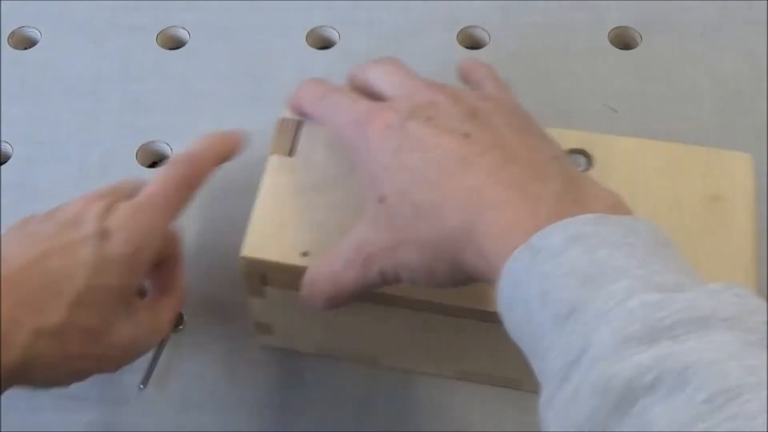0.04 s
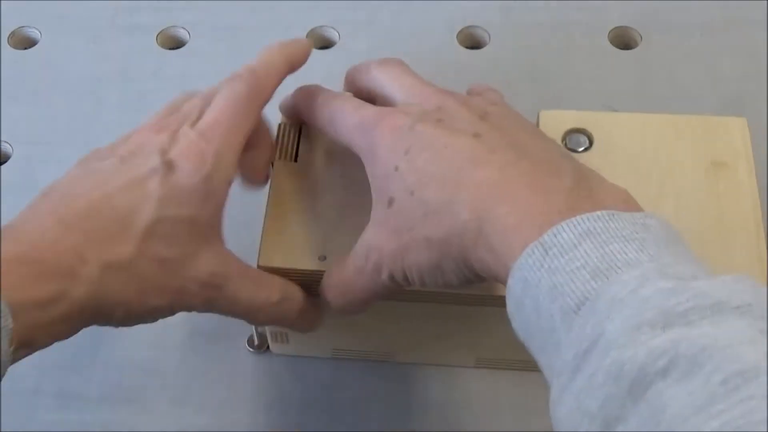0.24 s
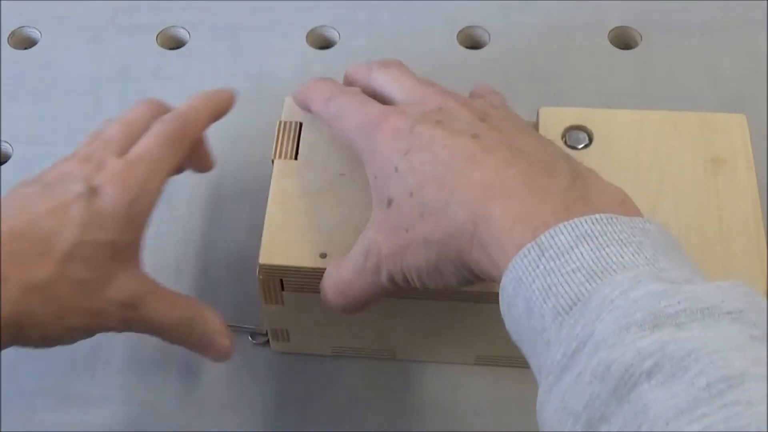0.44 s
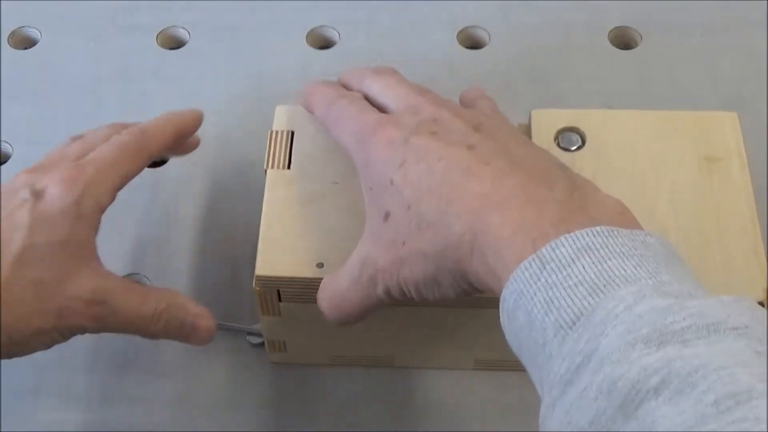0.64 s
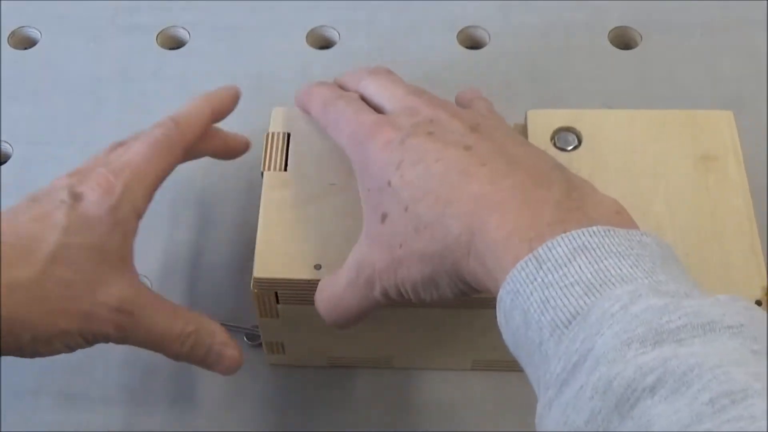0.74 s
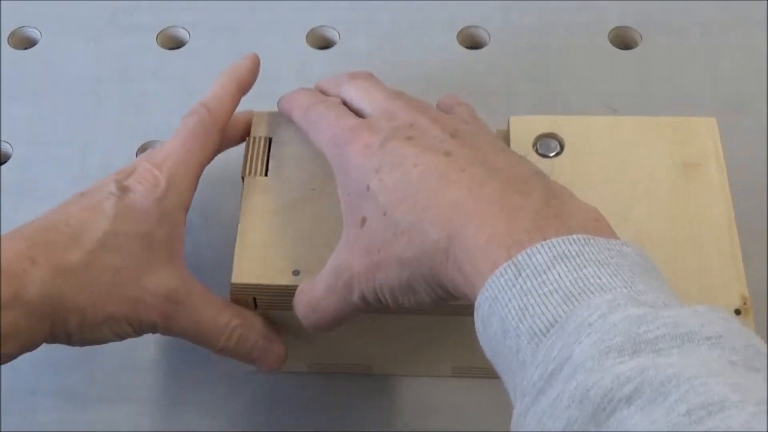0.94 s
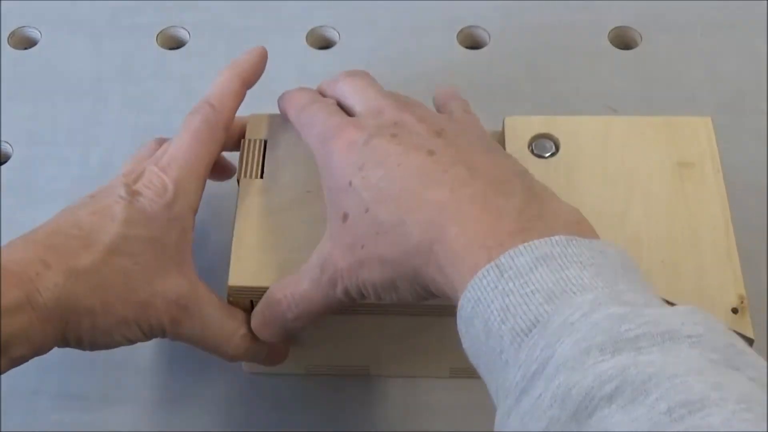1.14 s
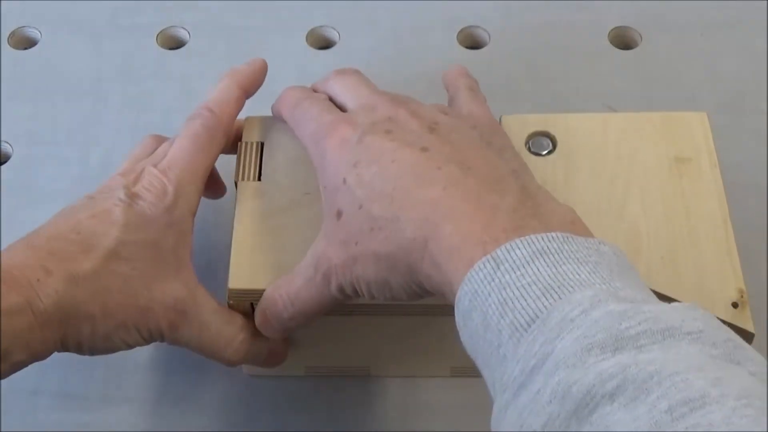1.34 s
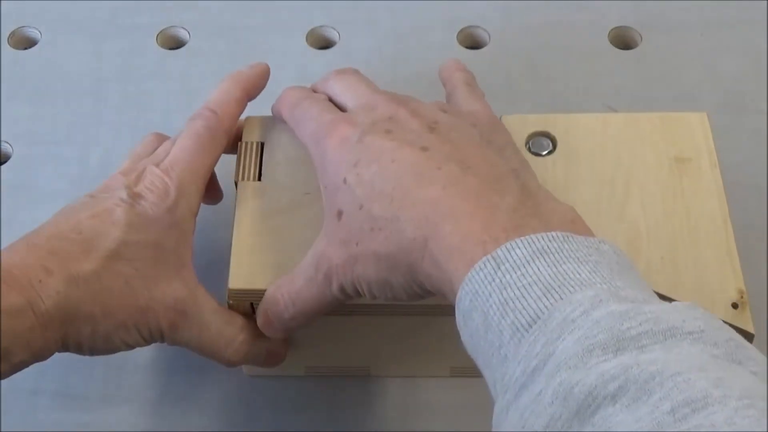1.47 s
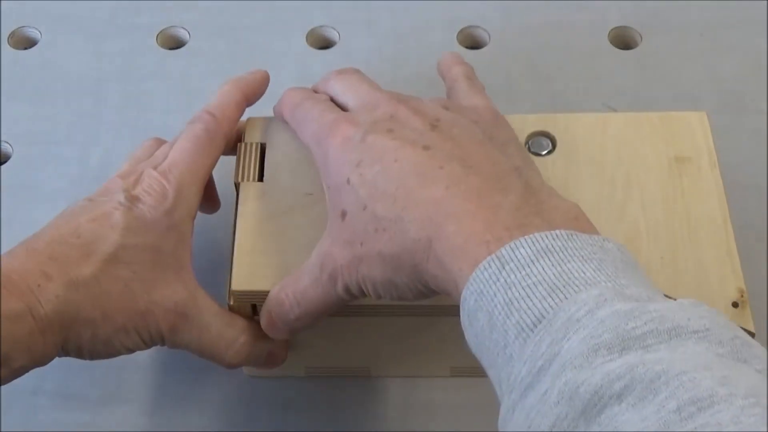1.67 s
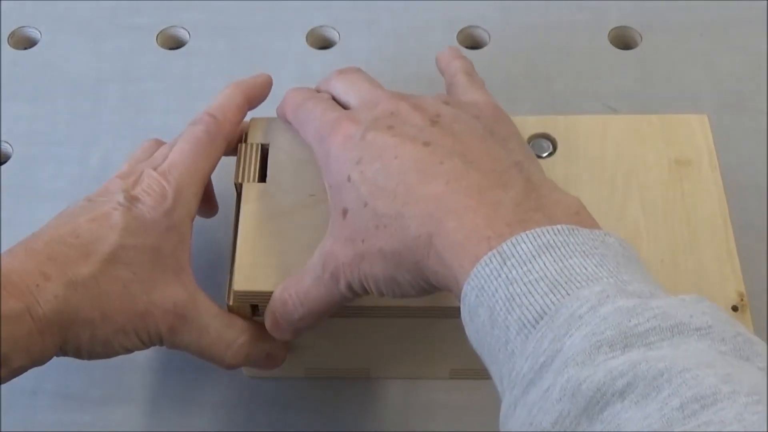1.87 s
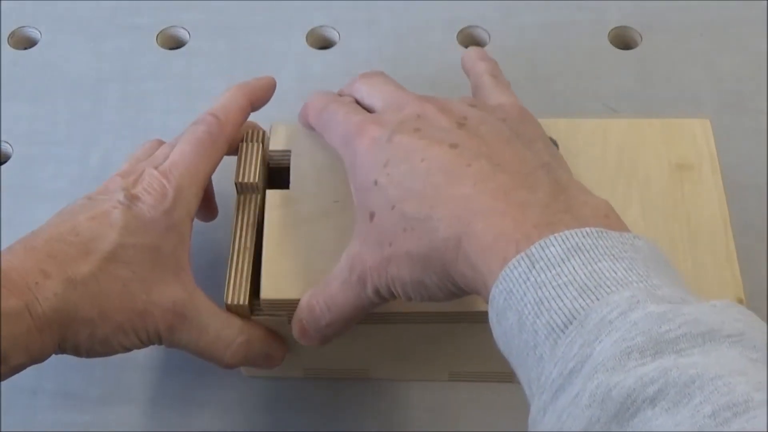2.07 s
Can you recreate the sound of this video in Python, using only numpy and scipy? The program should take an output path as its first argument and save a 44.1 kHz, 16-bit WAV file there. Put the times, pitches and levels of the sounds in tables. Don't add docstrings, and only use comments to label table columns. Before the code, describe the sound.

Wood box dragged on a bench, small steel key clinking, then faint rubs and a brief lid scrape.

```python
import sys
import numpy as np
from scipy import signal
from scipy.fft import rfft, irfft, next_fast_len
from scipy.io import wavfile
from scipy.ndimage import uniform_filter1d, map_coordinates

SR = 44100
rng = np.random.default_rng(int(sys.argv[2]) if len(sys.argv) > 2 else 0)


def pcm_store(signal):
    levels = np.round(np.clip(np.atleast_2d(signal), -1, 1) * 32767)
    wavfile.write(sys.argv[1], SR, levels.astype(np.int16).T)


def makeup_ratio(level_db):
    decades = np.asarray(level_db, float) / 20
    return 10 ** decades


N = 92830

# frequency in Hz, left-right likeness from 0 to 1.
WOOD_ALIKE = [(200, 1), (1000, 1), (4000, 0.95), (10000, 0.99)]


def unit(x):
    return x / np.sqrt(np.mean(x ** 2) + 1e-20)


def along(points, hz):
    f, v = np.transpose(points)
    return np.interp(np.log(hz + 1), np.log(f + 1), v)


def closed(points):
    low_end, high_end = (points[0][0] * .5, -70), (points[-1][0] * 1.2, -70)
    ends = [low_end] + list(points) + [high_end]
    return lambda hz: makeup_ratio(along(ends, hz))


def resonant(peaks):
    def response(f):
        total = 0
        for k, (centre, width, db) in enumerate(peaks):
            mode = 1j * f * width / (centre * centre - f * f + 1j * f * width)
            total = total + (-1) ** k * makeup_ratio(db) * mode
        return total
    return response


def filtered(x, response):
    m = next_fast_len(N + SR // 2)
    return irfft(rfft(x, m) * response(np.fft.rfftfreq(m, 1 / SR)), m)[..., :N]


def wobble(rate):
    knots = rng.standard_normal(int(N * rate / SR) + 4)
    return map_coordinates(knots, [np.arange(N) * rate / SR])


def paired(a, b, alike):
    def mid_side(hz):
        angle = np.arccos(np.clip(along(alike, hz), -1, 1)) / 2
        return np.array([np.cos(angle), np.sin(angle)])
    mid, side = filtered(np.array([a, b]), mid_side)
    return np.array([mid + side, mid - side])


def mains_hum():
    # multiple of the mains frequency, level in dB.
    harmonics = [(1, -53.5), (2, -58), (3, -55.5), (4, -81), (5, -65), (6, -65), (7, -70.5), (8, -63.5),
                 (19, -66), (20, -73), (24, -63.5)]
    mains_hz, waver_db = 58.9, 1.2
    phase = 2 * np.pi * mains_hz * np.arange(N) / SR + 0.086 * wobble(3.7)
    hum = np.zeros(N)
    for k, db in harmonics:
        hum += makeup_ratio(db - 0.5 + waver_db * wobble(7.17)) * np.cos(k * phase - 0.32 * k)
    return hum


def steady_hiss():
    # frequency in Hz, level in dB per Hz.
    air_spectrum = [(15, -41), (25, -21), (63, 4.5), (87, -12.5), (200, -7.5), (363, -7), (545, -10.5),
                    (1020, -10.5), (1500, -9), (2100, -14.5), (16000, -26)]
    # frequency in Hz, left-right likeness from 0 to 1.
    air_alike = [(100, 0.99), (1000, 0.34), (4000, 0.37), (10000, 0.89)]
    a, b = filtered(rng.standard_normal((2, N)), closed(air_spectrum))
    return makeup_ratio(-50) * unit(paired(a, b, air_alike))


def slips():
    slips_per_s, spread_db, patchy_db = 6000, 2.5, 1.1
    hit = rng.random(N) < slips_per_s / SR
    size = makeup_ratio(spread_db * np.clip(rng.standard_normal(N), -2, 2))
    raw = hit * rng.standard_normal(N) * size + 0.47 * rng.standard_normal(N)
    z = signal.stft(raw, nperseg=256)[2]
    patches = uniform_filter1d(rng.standard_normal(z.shape), size=4, axis=0)
    patches = uniform_filter1d(patches, size=10, axis=1)
    return unit(signal.istft(z * makeup_ratio(patchy_db * unit(patches)), nperseg=256)[1][:N])


def scrape():
    # time in seconds, speed as level in dB,
    # weight on the box in dB, dry rubbing hiss in dB.
    drag = [
        (.005, -45.5, -5, 1),
        (0.033, -55.5, 17, 5),
        (0.042, -36, 3, -2.5),
        (0.077, -24, 7, -10.5),
        (0.179, -27, 2, -18),
        (.27, -26, -11, -12.5),
        (.37, -35, -2, -14.5),
        (.46, -39.5, -4.5, -8.5),
        (.54, -52.5, 2, -42),
    ]
    nudges = [
        [(.57, -51.5, -3, -10), (.61, -42, -1, -7.5), (.64, -39, 1, -22), (.68, -46.5, 2.5, -15),
         (.712, -38, 1, -15), (.76, -47, 5, -30), (.8, -53.5, 9, -20)],
        [(.81, -48.5, 2, -17), (.848, -37.5, -13, -20.5), (.97, -32.5, -1, -15.5), (1.035, -33, -4, -20.5),
         (1.06, -41, 0, -21), (1.13, -49, 0, -12), (1.18, -49.5, 3.5, -2.5), (1.25, -51.5, 3, -13)],
    ]
    lid_slide = [
        (1.928, -54, 12, -13),
        (1.955, -48, 0, -11),
        (1.98, -39, -2, -11),
        (2.025, -43, -1.5, -11.5),
        (2.039, -41, 3, -5),
        (2.053, -40, -3, -18),
        (2.07, -39.5, 4, -9),
        (2.105, -36.5, -5, -15),
    ]
    rasp_levels = [-5.5, -13.5, -16, -24]
    # frequency in Hz, level in dB per Hz.
    grain_spectrum = [(120, -48), (200, -33), (710, 2), (937, 8), (1780, 3.5), (2120, 1), (2520, -4),
                      (5460, -30.5), (6500, -23), (8450, -68), (14300, -120)]
    rasp_spectrum = [(2000, 10), (2500, -4.5), (3300, -0.5), (4500, -4.5), (5500, -4), (6100, -7),
                     (7500, -10)]
    rub_spectrum = [(6500, -9), (8000, -2), (10000, 0), (12000, -2), (14000, -16.5), (15800, -13)]
    # frequency in Hz, width in Hz, level in dB.
    panel_modes = [(469, 64, 3), (661, 17, 11), (903, 16, 5.5), (1273, 23, 12), (1599, 22, 6.5),
                   (2170, 33, 9.5), (2910, 36, -2.5), (3230, 22, 0), (3680, 630, -12.5), (4580, 130, -7.5),
                   (5150, 1300, -18.5)]
    hollow_modes = [(215, 62, 3), (307, 20.6, 6.5), (440, 134, -1)]
    lid_modes = [(1287, 19, 1), (2155, 42, 0.5), (2510, 25, -12), (3220, 29, -17), (4000, 250, -13),
                 (4680, 44, -14), (5300, 150, -15)]
    seated_modes = [(1278, 27, 3.5), (1140, 33, 2), (2510, 26, -8), (3400, 60, -14), (4100, 150, -15),
                    (5200, 170, -11.5)]
    ring_db, lid_db, hollow_db, lid_grain_db, judder_db = -0.5, -0.5, -7, -1.5, .6
    lid_from_s, seat_s, seat_span_s = 1.6, 2.025, .03
    rasp_lift = 0.49

    t = np.arange(N) / SR
    speed, weight, rub, rasp = np.zeros((4, N))
    for rows, rasp_db in zip([drag, lid_slide, *nudges], rasp_levels):
        s, db, press_db, rub_db = np.transpose(rows)
        gain = makeup_ratio(np.interp(t, s, db, left=-120, right=-120))
        press = np.interp(t, s, press_db)
        speed = speed + gain
        weight = weight + gain * makeup_ratio(press)
        rasp = rasp + gain * makeup_ratio(rasp_db - rasp_lift * press)
        rub = rub + gain * makeup_ratio(np.interp(t, s, rub_db))
    judder = makeup_ratio(judder_db * (wobble(61.44) + wobble(200)))
    on_bench = t < lid_from_s
    seated = np.clip((t - seat_s) / seat_span_s, 0, 1)

    def layer(drive, colour):
        return unit(filtered(drive, colour))

    def take(drive):
        fibres = np.where(on_bench, 1, makeup_ratio(lid_grain_db)) * layer(drive, closed(grain_spectrum))
        panels = makeup_ratio(ring_db) * layer(drive, resonant(panel_modes))
        lid = np.sqrt(1 - seated) * layer(drive, resonant(lid_modes))
        lid = lid + np.sqrt(seated) * layer(drive, resonant(seated_modes))
        wood = speed * 0.6 * (fibres + np.where(on_bench, panels, makeup_ratio(lid_db) * lid))
        hollow = weight * makeup_ratio(hollow_db) * layer(drive, resonant(hollow_modes))
        edge = rasp * layer(slips(), closed(rasp_spectrum))
        hiss = rub * layer(rng.standard_normal(N), closed(rub_spectrum))
        return judder * (wood + hollow + edge + hiss)

    return paired(take(slips()), take(slips()), WOOD_ALIKE)


def damped_modes(rows):
    out, t = np.zeros(N + SR), np.arange(SR // 8) / SR
    for s, db, hz, t60 in rows:
        soft_start = 1 - np.exp(-t * hz * 3)
        ring = makeup_ratio(db + 1 - 60 * t / t60) * np.sin(2 * np.pi * hz * t)
        out[round(s * SR):][:len(t)] += ring * soft_start
    return out[:N]


def box_knocks():
    # start in seconds, peak in dB, frequency in Hz, t60 in seconds.
    knock_rows = [(.005, -36, 206, 0.034), (.0401, -33, 1150, 0.014), (.042, -22.5, 172, 0.05),
                  (.0712, -16, 227, 0.016), (.0713, -8, 327, 0.022), (.0716, -6, 1256, 0.015),
                  (.151, -13, 2170, 0.024), (.22, -38, 1560, 0.038), (.637, -32.5, 2120, 0.025),
                  (.41, -42, 176.6, 0.5), (.597, -34, 181, 0.054), (1.527, -34, 163, 0.041),
                  (1.77, -35.5, 215, 0.061), (1.926, -25, 205, 0.026), (2.065, -32, 302, 0.048)]
    return damped_modes(knock_rows)


def focus_motor():
    # frequency in Hz, level in dB, t60 in seconds.
    housing_modes = [(2480, -1, .011), (2850, -2, .007), (3300, 0, .012), (3900, -5, .006),
                     (4500, -7, .006)]
    weak_step_db = np.array([[-4], [-11], [-2], [-9], [-9]])
    first_s, period_s, count = .0708, .033367, 50
    tick_db, echo_s, echo_db, detune = -44, .008, -5, .012
    out, t = np.zeros(N), np.arange(SR // 40) / SR
    hz, level, t60 = np.transpose(housing_modes)[:, :, None]
    soft_start = 1 - np.exp(-t / .001)
    draws = rng.standard_normal((count, 2, 3, len(housing_modes), 1))
    for k, draw in enumerate(draws):
        for late_s, db, (size, pitch, phase) in zip((0, echo_s), (0, echo_db), draw):
            decay = makeup_ratio(level + weak_step_db * (k % 2) + 1.1 * size - 60 * t / t60)
            tone = np.sin(2 * np.pi * hz * (1 + detune * pitch) * t + 2 * phase)
            ring = decay * tone * soft_start
            start = round((first_s + k * period_s + late_s) * SR)
            out[start:][:len(t)] += makeup_ratio(tick_db + 8 + db) * ring.sum(axis=0)
    return out


def key_clinks():
    # start in seconds, peak in dB, centre in Hz, width in octaves, length in seconds.
    clink_rows = [(.1488, -13, 4700, .2, .006), (.1489, -15, 10500, .25, .006),
                  (.151, -17, 4700, .25, .008), (.1515, -17, 10700, .2, .008),
                  (.1545, -17, 10300, .22, .006), (.1555, -20, 4000, .5, .005),
                  (.1578, -21, 9500, .3, .003), (.1635, -20, 11500, .22, .003), (.169, -24, 9000, .3, .003),
                  (.1795, -26, 10000, .2, .002), (.182, -24, 9000, .2, .003), (.189, -25, 10500, .25, .003),
                  (.2048, -22, 10000, .3, .003), (.2195, -5, 8500, .35, .0025),
                  (.2196, -11, 3500, .7, .0025), (.2207, -5, 7500, .4, .004), (.2208, -11, 2500, .7, .003),
                  (.223, -19, 10500, .2, .005), (.2312, -6, 11500, .33, .003), (.2313, -15, 4500, .5, .003),
                  (.238, -10, 10200, .33, .0035), (.2392, -17, 5000, .5, .004),
                  (.245, -24, 11000, .2, .004), (.2515, -24, 9000, .3, .005), (.2612, -14, 5500, .2, .008),
                  (.2625, -17, 11500, .35, .007), (.264, -18, 3600, .2, .012), (.277, -19, 9300, .25, .005),
                  (.3045, -26, 9800, .18, .003), (.322, -23, 9500, .18, .002),
                  (.3222, -29, 14000, .15, .002), (.0715, -19, 3700, .44, .008),
                  (.0716, -25, 10000, .15, .01), (1.9253, -35, 5000, .6, .004),
                  (1.9255, -37, 9500, .45, .004)]
    # frequency in Hz, level in dB, t60 in seconds.
    key_modes = [(3600, 0, .03), (4750, 0, .03), (5370, 1, .022), (6840, 0, .02), (8000, 1, .02),
                 (9200, 0, .014), (10600, -1, .016), (11850, -3, .012), (13400, -4, .01)]
    key_db, scatter_db, crack_db, crack_s = -12, 2, 3, .001
    out, t = np.zeros((2, N + SR)), np.arange(2048) / SR
    f = np.fft.rfftfreq(len(t), 1 / SR)
    mode_hz, mode_db, t60 = np.transpose(key_modes)[:, :, None]
    noises = rng.standard_normal((len(clink_rows), 3, len(t)))

    def near(freq, hz, octaves):
        return np.exp(-.5 * (np.log2((freq + 1) / hz) / octaves) ** 2)

    for (s, db, hz, octaves, length), noise in zip(clink_rows, noises):
        band = irfft(rfft(noise[:2]) * near(f, hz, octaves) * hz / (f + hz))
        power = band[0] ** 2
        band = band / np.sqrt(uniform_filter1d(power, size=60, mode="wrap") + 0.21 * np.mean(power))
        decay = makeup_ratio(mode_db + scatter_db * noise[2, :len(key_modes), None] - 60 * t / t60)
        ring = near(mode_hz, hz, octaves) * decay * np.sin(2 * np.pi * mode_hz * t)
        snap = 1 + makeup_ratio(crack_db) * np.exp(-t / crack_s)
        crack = makeup_ratio(-7 - 20 * t / length) * snap * band * (1 - np.exp(-t / .0001))
        out[:, round(s * SR):][:, :len(t)] += makeup_ratio(db) * (crack + makeup_ratio(key_db) * ring.sum(axis=0))
    return paired(*out[:, :N], WOOD_ALIKE)


def motor_stop():
    # start in seconds, peak in dB, frequency in Hz, t60 in seconds.
    stop_rows = [
        (1.7448, -33, 2720, .018),
        (1.7452, -38, 5720, .015),
        (1.7466, -30, 3300, .016),
        (1.7455, -41, 8200, .007),
        (1.7452, -41, 4000, .006),
        (1.7454, -42, 4800, .006),
        (1.745, -44, 6900, .005),
        (1.745, -46, 9600, .004),
    ]
    return damped_modes(stop_rows)


def room_answer(x):
    # frequency in Hz, t60 in seconds.
    room_decay = [(200, 0.14), (2000, 0.53), (10000, 0.094)]
    hz, t, z = signal.stft(rng.standard_normal((2, SR // 2)), SR, nperseg=256)
    decay = makeup_ratio(-60 * t / along(room_decay, hz)[:, None])
    tail = signal.istft(z * decay, SR, nperseg=256)[1]
    tail = tail / np.linalg.norm(tail[0])
    delayed = np.pad(x, (200, 0))[None]
    return makeup_ratio(-12.5) * signal.fftconvolve(delayed, tail, axes=1)[:, :N]


def scene():
    # frequency in Hz, gain in dB.
    mic_response = [(60, -26), (140, 0.5), (5600, -0.5), (6100, -5), (6900, -5.5), (7800, -2),
                    (15500, -2.5)]
    left_db = .5
    contacts = scrape() + box_knocks() + key_clinks()
    near = filtered(contacts, lambda hz: makeup_ratio(along(mic_response, hz)))
    direct = near * makeup_ratio([[left_db], [-left_db]])
    camera = focus_motor() + motor_stop()
    return direct + room_answer(near.mean(axis=0)) + camera + mains_hum() + steady_hiss()


def low_pass(x):
    return signal.sosfilt(signal.butter(12, 16670, fs=SR, output="sos"), x)


def record(dry):
    ceiling, top_hz = .75, 15720
    held = dry / (1 + np.abs(dry / ceiling) ** 4) ** .25
    limited = filtered(held, lambda hz: 1 / (1 + (hz / top_hz) ** 240))
    return low_pass(limited)


dry = scene()
out = record(dry)
pcm_store(out)
```